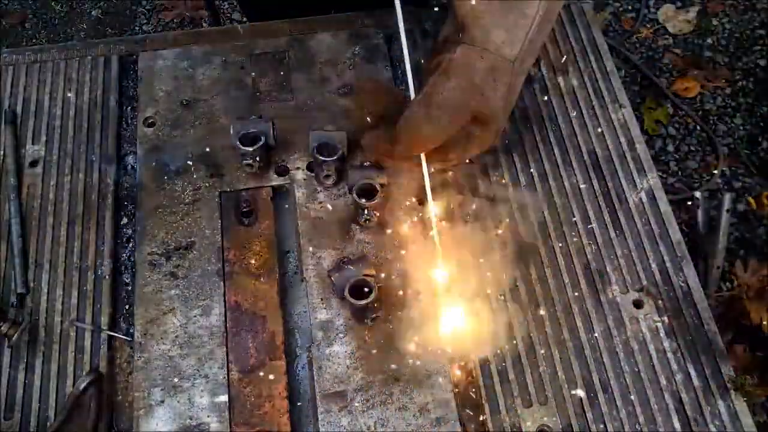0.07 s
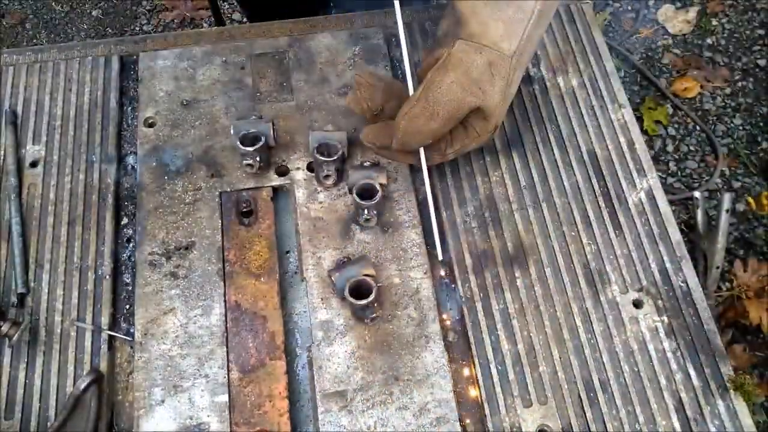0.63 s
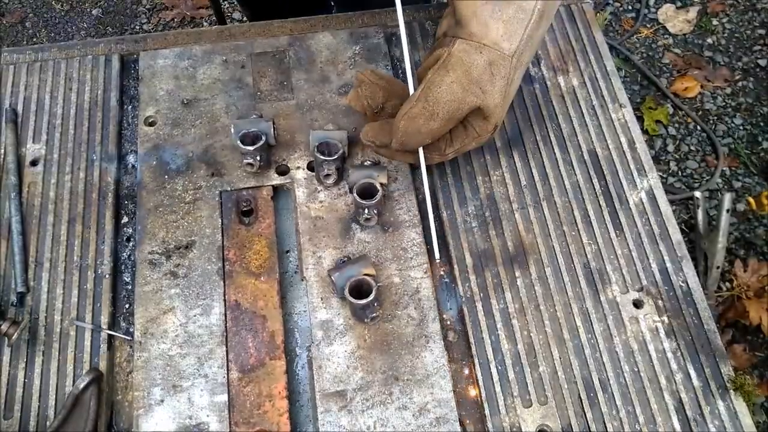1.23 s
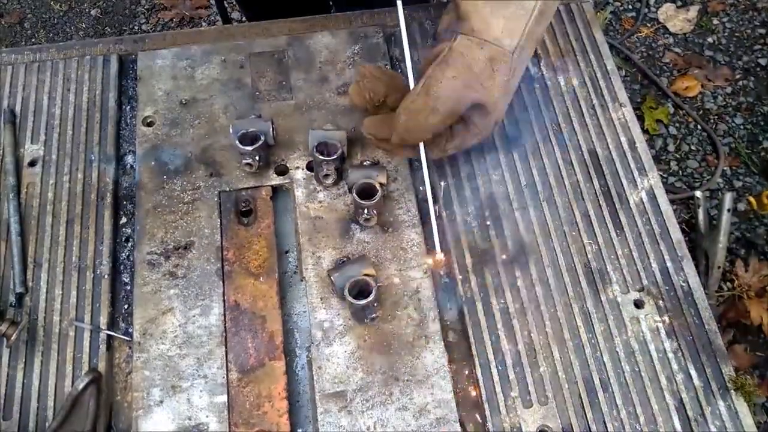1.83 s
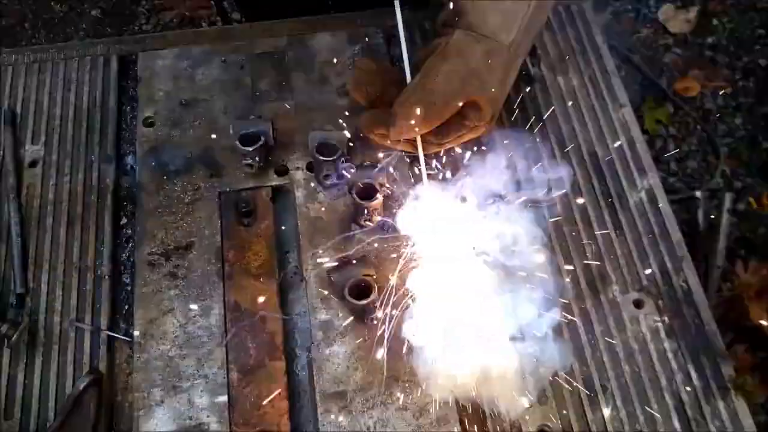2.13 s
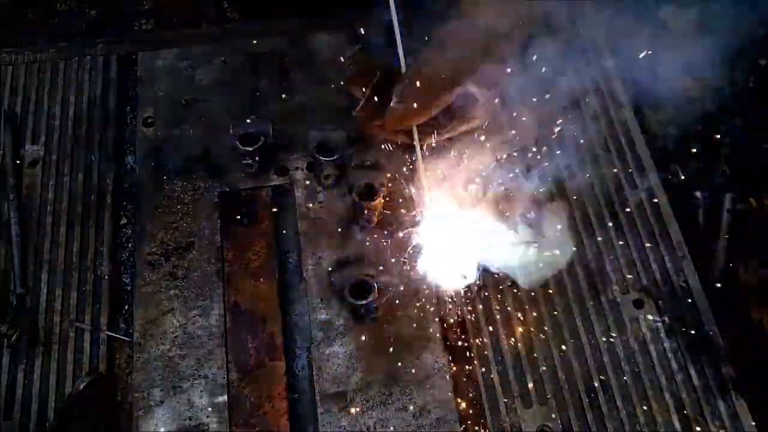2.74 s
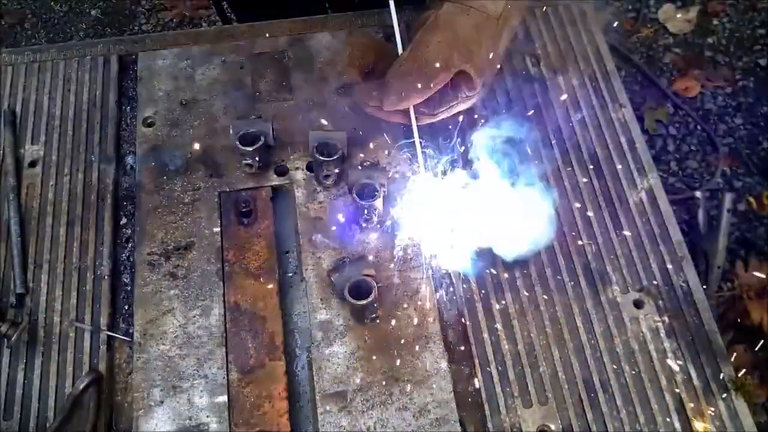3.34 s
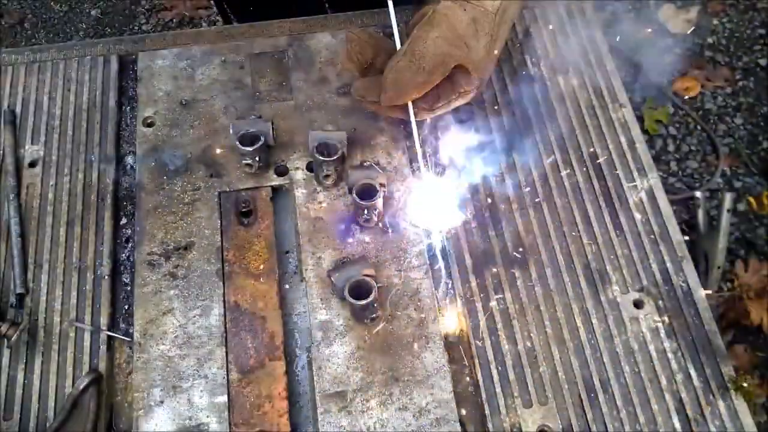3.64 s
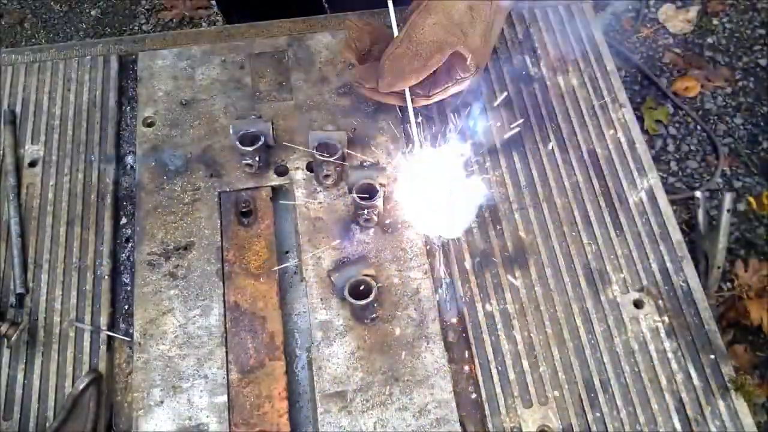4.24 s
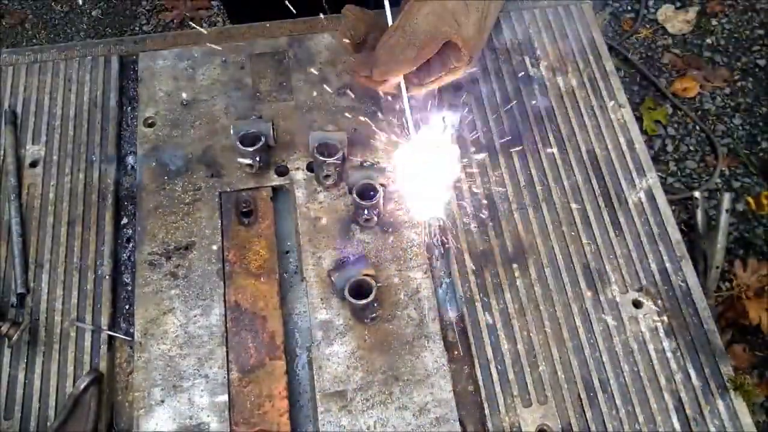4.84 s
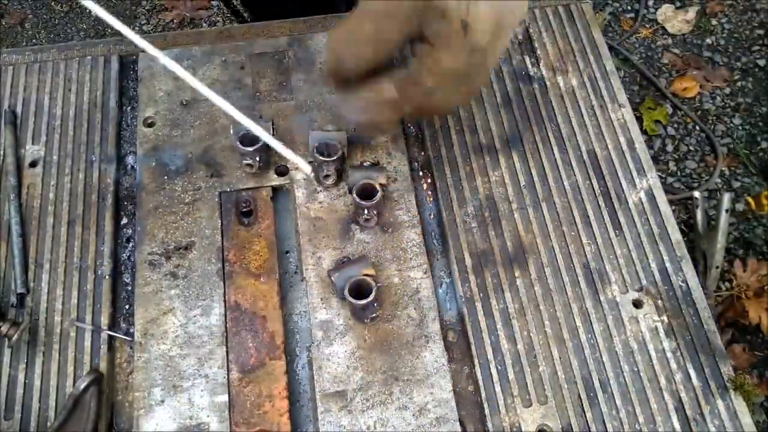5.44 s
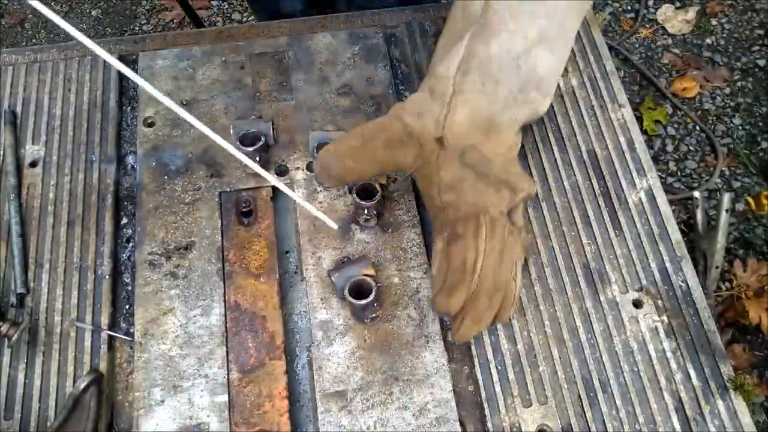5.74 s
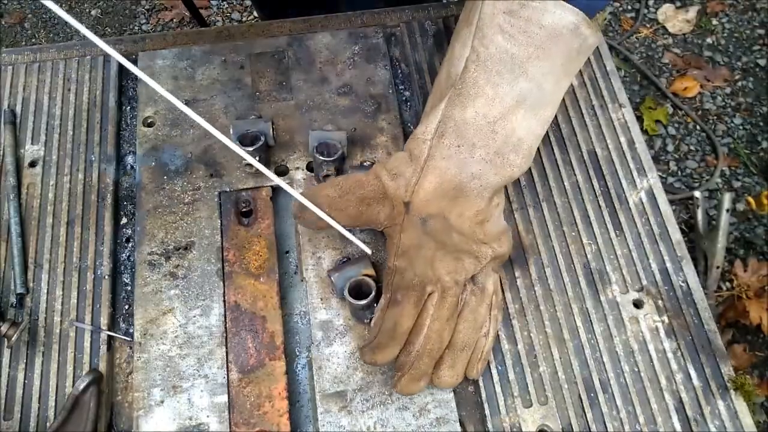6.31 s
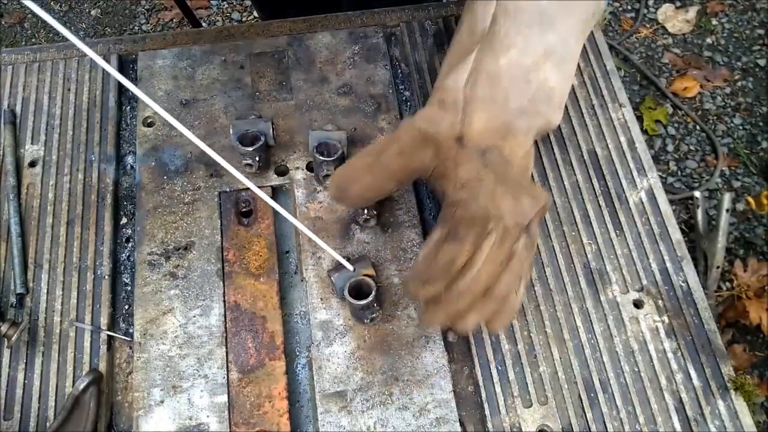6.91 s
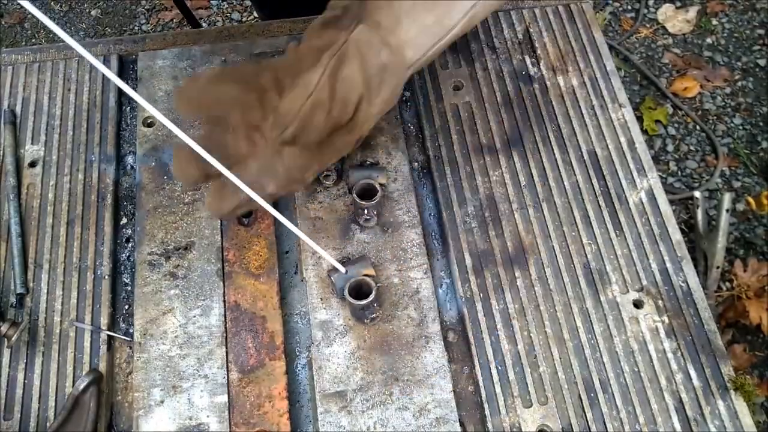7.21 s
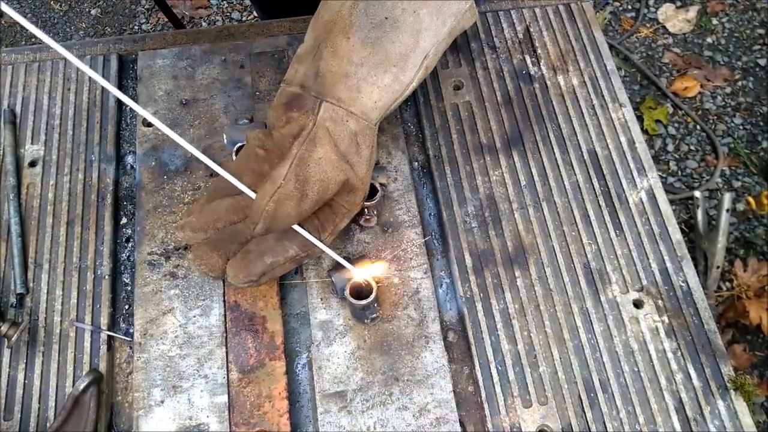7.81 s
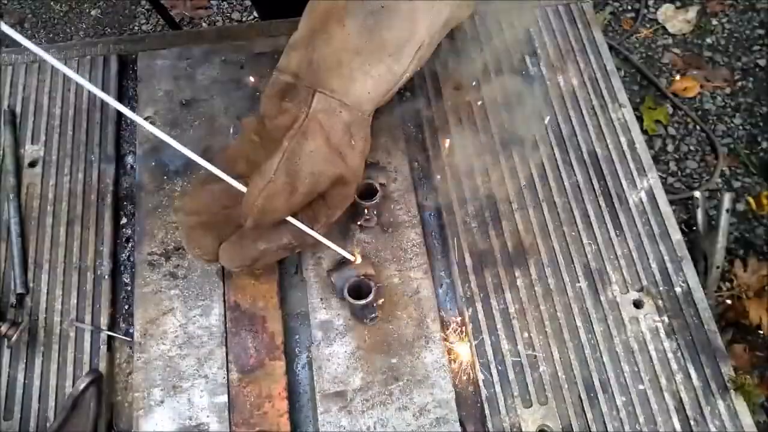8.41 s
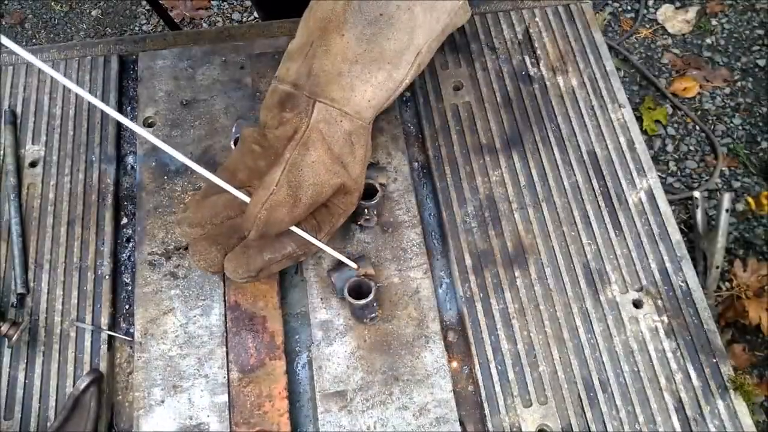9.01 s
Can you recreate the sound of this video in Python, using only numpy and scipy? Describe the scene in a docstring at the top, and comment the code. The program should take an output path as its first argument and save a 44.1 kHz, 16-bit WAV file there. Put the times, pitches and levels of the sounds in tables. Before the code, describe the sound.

An arc welder sizzles and spits in uneven bursts, pauses over a distant engine hum, then flares once more amid hollow knocks.

```python
"""A spit and a sharp pop, then bursts of sizzle: stick welding on an outdoor steel bench, close to a
small stereo microphone. The arc hisses and crackles, molten drops short it and burst, and spatter
ticks on the steel. A hollow plastic shell, likely the helmet, is bumped and knocked.
Some way off an engine generator drones, with faint chirps; both sink under the arc and the knocks
and swell in the pauses."""
import sys
import numpy as np
from scipy import signal
from scipy.fft import rfft, irfft, next_fast_len
from scipy.io import wavfile
from scipy.ndimage import uniform_filter1d

SR = 44100
rng = np.random.default_rng(int(sys.argv[2]) if len(sys.argv) > 2 else 0)


def unload_audio(sound):
    """Save the sound as a 16-bit wav file, at the path given as the first command line argument."""
    columns = np.transpose(np.atleast_2d(sound))
    # keep every value between -1 and 1, then stretch to whole-number steps
    steps = np.round(np.clip(columns, -1, 1) * 32767)
    wavfile.write(sys.argv[1], SR, steps.astype(np.int16))


N = 399546
TIME = np.arange(N) / SR

# burns at the bench: strike t/s, break t/s, base level/dB, sag over the burn/dB, roar re sizzle/dB
ARC_BURNS = [(0, 0.058, -26.5, -1, -2), (1.363, 1.46, -27.5, 4, 0.5), (1.714, 1.747, -23.5, 9, -10.5),
             (1.893, 2.11, -23, 11.5, -2.5), (2.12, 2.788, -28.5, -2.5, -3), (2.82, 2.982, -33, -13, -1),
             (3.062, 3.503, -28.5, -0.5, -5), (3.552, 3.574, -30.5, -4, -7.5), (3.664, 3.911, -32.5, 6, -4),
             (3.945, 3.983, -34.5, -4, -2), (4.123, 4.338, -31.5, 6, -6.5), (4.36, 4.466, -34, 0.5, -5.5),
             (4.485, 4.651, -30, -4.5, -8), (4.77, 4.941, -33, 5, -5.5), (7.858, 8.08, -38, 14.5, 1.5)]
# the arc's bright sizzle and lower roar, from close by: f/Hz, level/dB
SIZZLE_SPECTRUM = [(800, -41), (2000, -1), (3600, 1), (4700, -0.5), (5500, 4.5), (7000, 1.5), (10100, 1),
                   (11400, -1.5), (14500, -7)]
ROAR_SPECTRUM = [(60, -15), (450, 1), (1100, 2.5), (1900, 0.5), (3700, -3.5), (6000, -50)]
def arc(flutter_db=1.9, crackle_db=-3.5, echo_gain=0.42, break_s=0.0033, shrill_hz=9800, shrill_db=-21):
    """A short arc crackles, a drawn one hisses smoothly and shrilly; the bench reflects both."""
    # it strikes at once and thins out as the rod lifts
    gates = [(TIME >= strike) * (1 - np.tanh((TIME - end) / break_s / 2)) / 2
             for strike, end, *_ in ARC_BURNS]
    burning = sum(gates)
    short = sum(gate * shortness(sag_db) for gate, (_, _, _, sag_db, _) in zip(gates, ARC_BURNS))
    power_db, roar_db = burn_levels()
    flutter = undb(flutter_db * (walk(70) + .5 * walk(500)))  # the arc's length wavers
    crackle = (.5 + short) * undb(crackle_db)
    gas = flutter * (crackle * sparks(1600, 2.4) + rng.standard_normal(N)) / np.hypot(crackle, 1)
    # the echo's path shifts as the arc wanders over the pool
    echo_ms = .3 * undb(2.5 * walk(7))
    lag = (echo_ms * SR / 1000).astype(int)
    gas = gas + echo_gain * gas[np.maximum(np.arange(N) - lag, 0)]
    sizzle = unit(colour(gas, SIZZLE_SPECTRUM))
    roar = unit(colour(gas * undb(2 * walk(120)), ROAR_SPECTRUM)) * undb(roar_db)
    # the shrill edge comes and goes with the length of the arc
    shrill = unit(signal.lfilter(*signal.iirpeak(shrill_hz, Q=shrill_hz / 1300, fs=SR), gas))
    shrill *= undb(shrill_db + power_db / 2 + 3 * walk(8.7))
    return burning * undb(power_db) * (sizzle + roar) + (burning - short / 2) * shrill


# the longest tack, where the arc nearly chokes and picks up again: t/s, relative level/dB
CHOKING_TACK = [(2.16, -13.5), (2.342, -35), (2.393, -24.5), (2.42, -33.5), (2.568, -26.5), (2.746, -32.5),
                (2.76, -29.5)]
def burn_levels(arch_db=3, roar_hold=0.98, slump_db=14, slump_s=0.17):
    """Sizzle level and roar share in dB: each burn arches and sags, and slumps after each big drop."""
    power, roar = np.zeros(N), np.zeros(N)
    for strike, end, db, sag_db, roar_db in ARC_BURNS:
        i = int(strike * SR)
        from_middle = np.minimum((TIME[i:] - strike) / (end - strike), 1) - .5
        arch = arch_db * (2 - shortness(sag_db)) * (np.cos(np.pi * from_middle) - .5)
        power[i:] = db - sag_db * from_middle + arch
        roar[i:] = roar_db + roar_hold * sag_db * from_middle  # holds up while the sizzle sags
    times, db = np.transpose(CHOKING_TACK)
    strike, end, *_ = max(ARC_BURNS, key=lambda burn: burn[1] - burn[0])
    power += (TIME >= strike) * (TIME < end) * np.interp(TIME, times, db - db.mean())
    for s, thump_db, _ in BIG_DROPS:
        i = int(s * SR)
        power[i:] -= slump_db * undb(thump_db) * np.exp((s - TIME[i:]) / slump_s)
    return power, roar


def shortness(sag_db, drawn_sag_db=8):
    """1 for an arc held short, 0 for one drawn out so far that no drop can bridge it."""
    return np.clip(2 - sag_db / drawn_sag_db, 0, 1)


# big molten drops shorting the arc: t/s, thump level/dB, spit level/dB
BIG_DROPS = [(0.049, -15, -22), (1.3702, -23, -7), (1.447, -14, -17.5), (1.8958, -8.5, -7.5),
             (2.0968, -12.5, -17), (2.1313, -5.5, -26), (2.1903, -20, -18), (2.2977, -16, -17),
             (2.3894, -21, -22), (2.5625, -19, -16.5), (2.763, -18, -33), (2.8842, -13.5, -18.5),
             (2.95, -30, -20), (3.1199, -24, -16.5), (3.1576, -16.5, -20), (3.2105, -11, -14),
             (3.285, -22, -18.5), (3.3031, -27, -31), (3.37, -19, -22), (3.7354, -41, -15.5),
             (3.765, -37, -12.5), (3.813, -17, -17.5), (3.9753, -28, -18), (4.174, -31, -18.5),
             (4.2023, -16.5, -11), (4.211, -27, -18.5), (4.285, -30, -30), (4.3173, -22.5, -18),
             (4.424, -26, -19.5), (4.4875, -19, -26), (4.5984, -17.5, -24), (4.767, -22, -30),
             (4.8716, -22.5, -22), (7.8625, -15.5, -16.5), (7.9737, -21.5, -20), (8.0775, -23.5, -30.5)]
def drops(per_s=14, scatter_db=3, strike_lag_s=0.0019):
    """Rows for every pop: the big drops, one at each strike, and small drops by chance."""
    rows = list(BIG_DROPS)
    for strike, end, db, sag_db, _ in ARC_BURNS:
        rows.append((strike + strike_lag_s, db + 5, db + 1))
        times = strike + np.cumsum(rng.exponential(size=16)) / per_s
        levels = db + np.array([8.5, 10]) - scatter_db * rng.random((16, 2))  # thump, spit
        last_s = strike + (end - strike) * shortness(sag_db)
        rows += [(s, thump, spit) for s, (thump, spit) in zip(times, levels) if s < last_s]
    return rows


def pops(swing_ms=0.38, growth=0.16, spit_s=0.0026, lead_s=0.001, front_s=5e-5):
    """Each drop explodes: a shock front, a deep suction and a rebound, with a snap and a spit of spray."""
    thumps, spits, t = np.zeros(N), np.zeros(N), TIME[:600]
    for s, thump_db, spit_db in drops():
        drop_swing_ms = swing_ms * undb(growth * thump_db)  # bigger drops swing more slowly
        swing = np.abs(t - lead_s) * 1000 / drop_swing_ms
        add(thumps, s - lead_s, undb(thump_db + 2) * (swing - 1) * np.exp(-swing))
        add(thumps, s - lead_s / 2, undb(thump_db + 5) * np.exp(-t / front_s))  # shock front
        add(spits, s - lead_s / 2, undb(spit_db) * np.exp(-t / spit_s) * rng.standard_normal(len(t)))
        add(spits, s, undb([spit_db + 7]))  # snap
    return thumps + colour(spits, SIZZLE_SPECTRUM)


# gas puffs as the rod lights: t/s, level/dB, swing/ms
GAS_PUFFS = [(1.37, -13, 0.75), (1.715, -12, 0.27)]
def puffs():
    """Gas from the rod's coating flares up at a strike: one push and suction."""
    pressure = np.zeros(N)
    for s, db, swing_ms in GAS_PUFFS:
        swing = TIME[:2048] * 1000 / swing_ms
        add(pressure, s, undb(db) * swing * (2 - swing) * np.exp(-swing))
    return pressure


# flares of the hot tip, scrapes of rod and glove: t/s, length/s, level/dB
TIP_FIZZES = [(0.068, 0.018, -34.5), (0.727, 0.17, -46), (1.135, 0.35, -53), (3.592, 0.018, -40),
              (6.297, 0.0187, -29), (8.44, 0.13, -58)]
# spatter landing on the bench: t/s, level/dB
BEAD_TICKS = [(.257, -35), (1.06, -30.5), (5.437, -27.5)]
def spatter(tick_s=0.001, pool_db=-49.5, cooling_s=0.14):
    """The electrode and the cooling pool fizz briefly; hot beads tick on steel."""
    swell, ticks = np.zeros(N), np.zeros(N)
    for s, length_s, db in TIP_FIZZES:
        progress = np.minimum(TIME[:SR // 2] / length_s, 1)
        rise = np.minimum(np.sqrt(4 * progress), 1)
        fall = np.minimum(10 * (1 - progress), 1)
        add(swell, s, undb(db) * rise * fall)
    for strike, end, *_ in ARC_BURNS:  # the pool fizzes on, louder after a long burn
        add(swell, end, undb(pool_db) * np.sqrt(end - strike) * np.exp(-TIME[:SR] / cooling_s))
    for s, db in BEAD_TICKS:
        add(ticks, s, undb(db) * np.exp(-TIME[:600] / tick_s))
    fizz = unit(colour(sparks(12000, 1.5), [(700, 3.5), (10000, 2.5), (13000, -4.5)]))
    fizz *= undb(2 * walk(50))
    treble = unit(np.diff(rng.standard_normal(N + 1)))  # tiny beads radiate only treble
    return swell * fizz + ticks * treble


# soft bumps on the shell's face: t/s, level/dB, contact/ms
FACE_BUMPS = [(1.07, -32.5, 0.17), (1.0937, -16.5, 0.46), (1.122, -28.5, 0.92), (1.17, -23, 1),
              (1.2, -24.5, 0.98), (1.624, -24, 0.49)]
# hard knocks on its rim: t/s, level/dB, contact/ms, rattle re knock/dB
RIM_KNOCKS = [(7.401, -13, 1.0, -6.5), (7.425, -8.5, 1.1, -23), (7.435, -7, 0.23, -14),
              (7.451, -12, 0.49, -14), (7.612, -25, 0.25, -28), (7.6187, -11.5, 0.55, -26),
              (7.6879, -8.5, 0.081, -7), (7.847, -27, 0.86, -15), (8.151, -29, 0.69, -16),
              (8.175, -25, 0.75, -3), (8.198, -27, 0.51, -16)]
# modes of the face and of the rim: f/Hz, level/dB, t60/s
FACE_MODES = [(176, -12.5, 0.072), (326.5, -3.5, 0.14), (386, 3.5, 0.061), (797, -2, 0.034),
              (1264, -6.5, 0.066)]
RIM_MODES = [(332.7, -9.5, 0.084), (433, -3.5, 0.016), (644, -7, 0.097), (765, -7, 0.071),
             (973, -5.5, 0.031), (1157, -15, 0.099), (1430, -12, 0.052), (1880, -2, 0.011)]
def shell(rattle_s=0.012):
    """A hollow plastic shell near the microphone: soft bumps boom, hard knocks also rattle."""
    body, rattle = np.zeros(N), np.zeros(N)
    for s, db, contact_ms in FACE_BUMPS:
        bump = blow(FACE_MODES, contact_ms, clatter_db=-10, clatter_s=.018, bend=.17)
        add(body, s, undb(db + 1) * bump)
    for s, db, contact_ms, rattle_db in RIM_KNOCKS:
        add(body, s, undb(db) * blow(RIM_MODES, contact_ms, clatter_db=-6, clatter_s=.011))
        add(rattle, s, undb(db + rattle_db) * np.exp(-TIME[:SR // 4] / rattle_s))
    grit = unit(colour(sparks(7900, 2.1), [(500, -29), (3300, -7), (5000, -4), (14000, -16.5)]))
    return body + rattle * grit / 2


def blow(modes, contact_ms, clatter_db, clatter_s, bend=0, relax_s=0.031):
    """One blow on the shell: ringing modes and a dense clatter, duller the longer the contact."""
    t = TIME[:SR // 4]
    # a flexed wall starts sharp and relaxes to its own pitch
    bent_t = t + bend * relax_s * (1 - np.exp(-t / relax_s))
    ring = np.zeros(len(t))
    for k, (hz, db, t60) in enumerate(modes):
        decay = undb(db + 1.5 * rng.standard_normal() - 60 * t / t60)
        detuned_hz = hz * (1 + .012 * rng.standard_normal())
        ring += (-1) ** k * decay * np.sin(2 * np.pi * detuned_hz * bent_t)
    noise = rng.standard_normal(len(t))
    clatter = unit(colour(noise, [(100, -18), (330, 13), (1800, 7), (3500, 10.5), (6000, -27)]))
    ring += undb(clatter_db) * clatter * np.exp(-t / clatter_s)
    corner_hz = min(500 / contact_ms, SR / 3)
    ring = signal.sosfilt(signal.butter(2, corner_hz, fs=SR, output="sos"), ring)
    return ring / np.sqrt(np.mean(ring[:512] ** 2)) / 2


# the generator's hum, some way off: multiple of the firing rate, level/dB
ENGINE_ORDERS = [(2, 6), (3, -2), (5, 7), (7, -0.5), (10, -6.5), (11, 5.5), (12, 7), (13, -1), (34, -12.5),
                 (36, -4), (37, -17), (40, 0), (41, -7), (43, -2), (45, -13)]
# its exhaust and fan noise: f/Hz, level/dB
EXHAUST_SPECTRUM = [(25, -13), (100, -13.5), (350, 1.5), (600, -5), (1300, -13), (2000, -13), (3300, -9.5),
                    (5000, -21.5), (10300, -23.5), (12500, -29.5)]
# stereo width of that noise: f/Hz, side re mid/dB
EXHAUST_WIDTH = [(60, 9), (500, -3), (1200, -4), (2200, 0.5)]
def generator(firing_hz=29.87, hum_db=-2, air_db=-3, chuff=0.065, port_phase_rad=1.4):
    """A governed one-cylinder engine: a steady hum, and exhaust and fan noise chuffing once a firing."""
    phase = 2 * np.pi * np.cumsum(firing_hz * (1 + 0.0013 * walk(3))) / SR
    orders, db = np.transpose(ENGINE_ORDERS)
    hum = np.zeros((2, N))
    for k in range(2, 63):
        # the deepest lines reach the microphone's two ports out of step
        skew = port_phase_rad * np.exp(-k / 14) * np.array([[.5], [-.5]])
        hum += undb(np.interp(k, orders, db)) * np.cos(k * phase + rng.uniform(0, 2 * np.pi) + skew)
    throb = (1 + chuff * np.cos(phase)) * undb(1.2 * walk(8.5))
    mid, side = (unit(colour(rng.standard_normal(N) * throb, EXHAUST_SPECTRUM)) for _ in range(2))
    air = mid + colour(side, EXHAUST_WIDTH) * np.array([[1], [-1]])
    return undb(hum_db) * unit(hum) + undb(air_db) * air


# chirps in the distance: t/s, f/Hz
FAR_CHIRPS = [(6.45, 3250), (6.775, 3100), (7.055, 3400), (7.29, 3700)]
def birds(length_s=0.076, smear=0.021, level_db=-5):
    """Short wavering tones, like distant birds, half buried in the drone."""
    song = np.zeros(N)
    envelope = undb(level_db) * np.sin(np.pi * TIME[:int(length_s * SR)] / length_s)
    waver = walk(500)
    for s, hz in FAR_CHIRPS:
        i = int(s * SR)
        pitch = hz * (1 + smear * waver[i:i + len(envelope)])
        add(song, s, envelope * np.sin(2 * np.pi * np.cumsum(pitch) / SR))
    return song


def background_level(swell_db_per_s=9.5):
    """Background level in dB: it sinks under burns and knocks, deeper for loud ones, then swells."""
    dips = [(strike, end, -61 - .15 * db) for strike, end, db, _, _ in ARC_BURNS]
    dips += [(s, s, -44.5 - .18 * db) for s, db, _, _ in RIM_KNOCKS]
    level = dips[0][2] + swell_db_per_s * TIME
    for start, end, db in dips:
        i = int(start * SR)
        level[i:] = np.minimum(level[i:], db + swell_db_per_s * np.maximum(TIME[i:] - end, 0))
    return uniform_filter1d(level, size=1500)


def undb(db):
    """Decibels to gain."""
    return 10 ** (np.asarray(db) / 20)


def unit(x):
    """Scale to rms 1."""
    return x / np.sqrt(np.mean(x ** 2))


def colour(x, points, size=4096):
    """Minimum-phase filter through the points (f/Hz, level/dB)."""
    hz, db = np.transpose(points)
    f = np.maximum(np.fft.rfftfreq(size, 1 / SR), 1)
    gain = undb(np.interp(np.log(f), np.log(hz), db))
    cepstrum = irfft(np.log(gain))
    cepstrum[1:size // 2] *= 2
    cepstrum[size // 2 + 1:] = 0
    return signal.fftconvolve(x, irfft(np.exp(rfft(cepstrum))))[:len(x)]


def walk(rate):
    """Random drift of rms 1 that turns about rate times a second."""
    knots = rng.standard_normal(N // 8)
    return unit(np.interp(TIME * rate, np.arange(len(knots)), knots))


def sparks(per_s, scatter_db):
    """Random tiny clicks, a few far louder than the rest."""
    size = undb(scatter_db * np.minimum(rng.exponential(size=N), 6))
    return unit((rng.random(N) < per_s / SR) * size * rng.choice([-1, 1], N))


def add(track, s, sound):
    """Mix a sound into a track at time s."""
    i = max(int(s * SR), 0)
    track[i:i + len(sound)] += sound[:N - i]


HOLLOW_HZ = 2274  # the microphone's first hollow
# stereo width of sounds close to the microphone: f/Hz, side re mid/dB
CLOSE_WIDTH = [(100, -5.5), (700, -14), (2300, -4.5), (4000, -6.5), (11000, 1)]
def spread(x, wander_rate, steady, right_db, comb_top_hz=9000):
    """Left and right: the phase between the ports shifts as the sound leaves from changing spots."""
    quadrature = signal.hilbert(x, next_fast_len(N)).imag[:N]
    side = colour(quadrature * unit(steady + walk(wander_rate)), CLOSE_WIDTH)
    # midway between the microphone's hollows the two ports agree
    hz = np.linspace(1, SR / 2, 512)
    comb = np.abs(1 + np.exp(-(hz / comb_top_hz) ** 2 + 2j * np.pi * hz / HOLLOW_HZ))
    side = colour(side, np.c_[hz, 20 * np.log10(comb)])
    return np.array([x + side, x - side]) * undb([[-right_db], [right_db]])


def scene():
    """Weld and shell close by, a little right of centre; generator and chirps farther off."""
    weld = spread(arc() + pops() + puffs() + spatter(), wander_rate=490, steady=0.14, right_db=0.54)
    knocks = spread(shell(), wander_rate=85, steady=0.29, right_db=1)
    background = (generator() + birds()) * undb(background_level())
    return weld + knocks + background


def record(dry, hollow_width_hz=520, second_width_hz=230, top_hz=14400):
    """The stereo microphone cancels the centre in two narrow bands; peaks clip and the top is cut."""
    mid, side = (dry[0] + dry[1]) / 2, (dry[0] - dry[1]) / 2
    for hz, width_hz in ((HOLLOW_HZ, hollow_width_hz), (2 * HOLLOW_HZ, second_width_hz)):
        mid = signal.lfilter(*signal.iirnotch(hz, hz / width_hz, fs=SR), mid)
    clipped = np.clip([mid + side, mid - side], -1, 1)
    return signal.sosfilt(signal.ellip(10, .2, 80, top_hz, fs=SR, output="sos"), clipped)


dry = scene()
out = record(dry)
unload_audio(out)
```